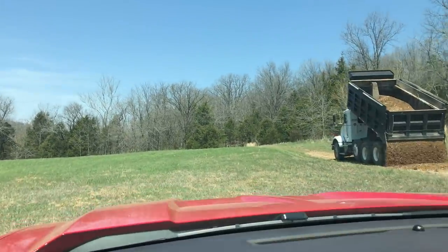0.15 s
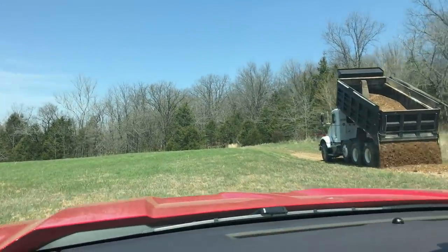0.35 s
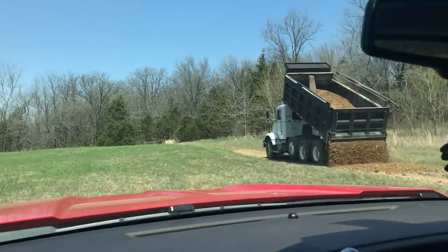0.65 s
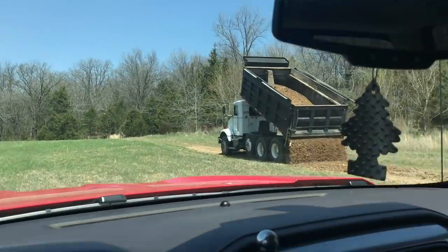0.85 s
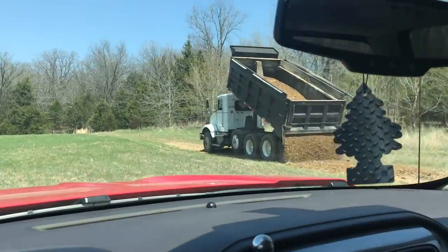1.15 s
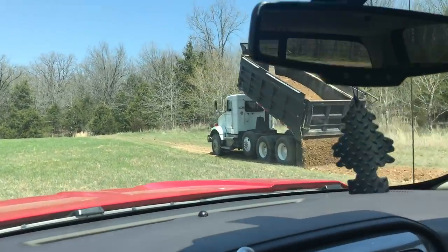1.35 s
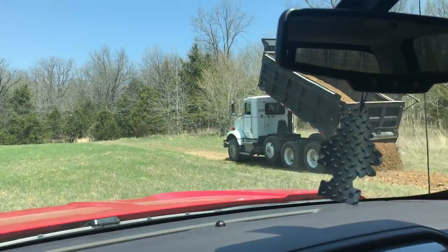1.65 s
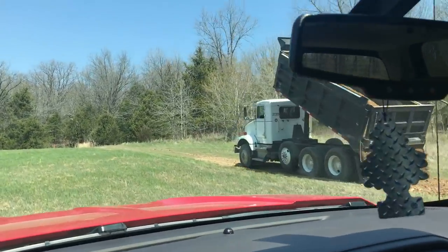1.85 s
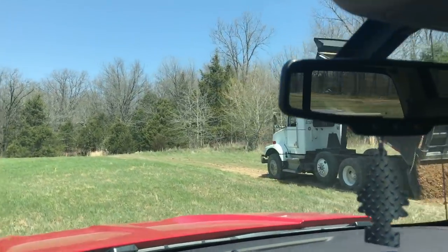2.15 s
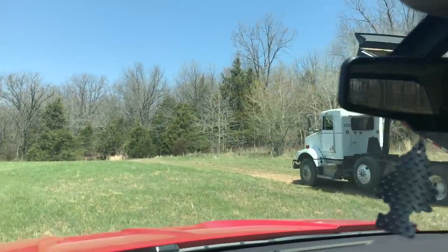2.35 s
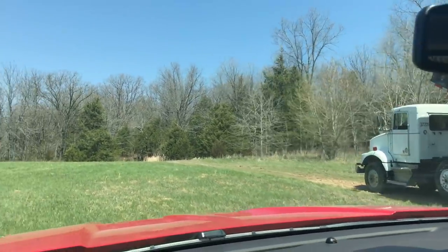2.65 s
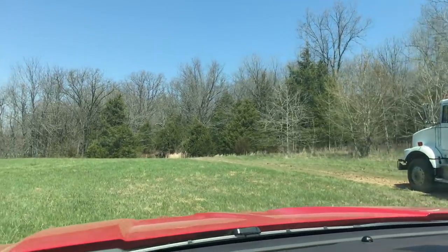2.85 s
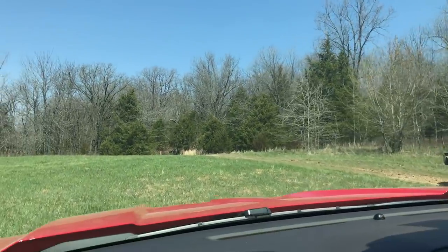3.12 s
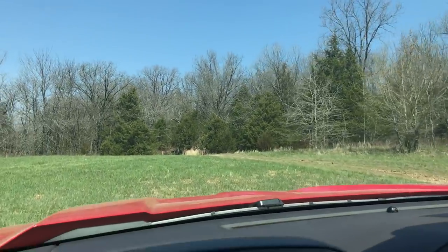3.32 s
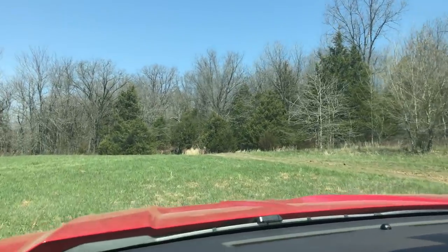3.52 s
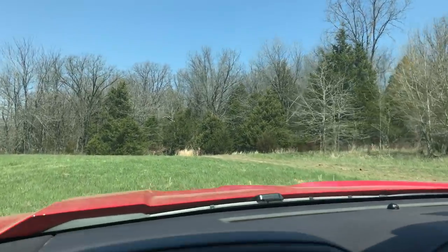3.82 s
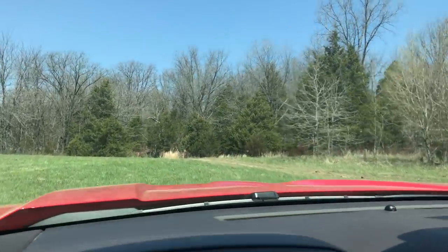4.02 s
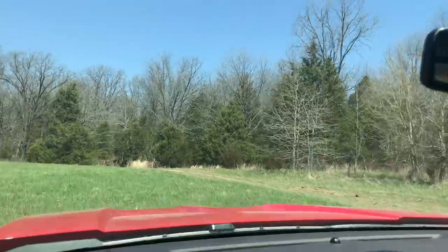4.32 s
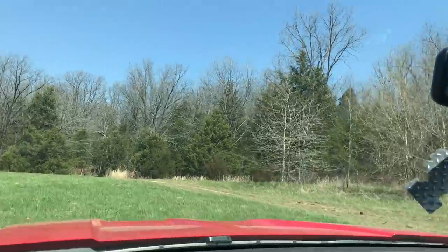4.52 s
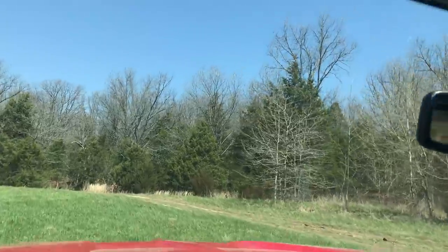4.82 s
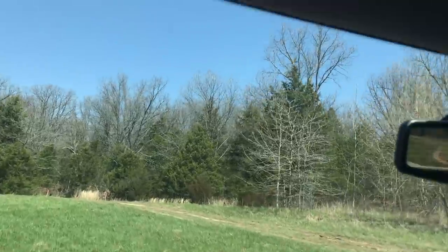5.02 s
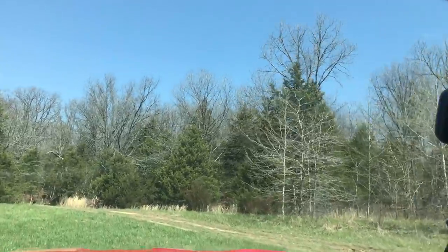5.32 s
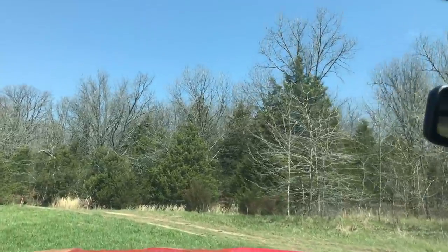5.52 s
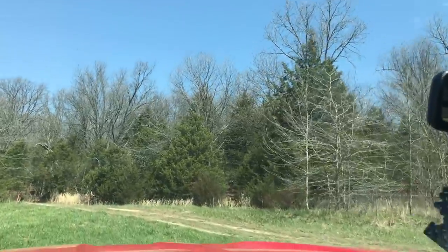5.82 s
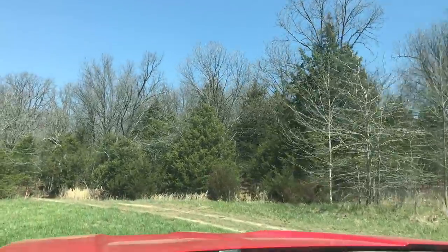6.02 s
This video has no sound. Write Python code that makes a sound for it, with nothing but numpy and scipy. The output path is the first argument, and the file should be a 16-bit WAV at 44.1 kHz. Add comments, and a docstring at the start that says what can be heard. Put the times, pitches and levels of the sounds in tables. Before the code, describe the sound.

Inside a slowly moving truck, a low boom and tyre rumble carry on under soft bumps, a steady vent fan and occasional small clacks.

```python
"""A deep boom and rumble fill the closed cab of a pickup rolling slowly over a rough track.
Ruts rock the body, the tyres shake the floor and panels, the engine hums, the drivetrain whines
faintly and the vent fan blows steadily. Grit ticks under the tyres and the suspension bumps.
Now and then something rustles softly, small metal clinks and loose plastic clacks at the jolts."""
import sys
import numpy as np
from scipy import signal
from scipy.fft import rfft, irfft, next_fast_len
from scipy.io import wavfile
from scipy.ndimage import uniform_filter1d

SR = 44100
rng = np.random.default_rng(int(sys.argv[2]) if len(sys.argv) > 2 else 0)


def to_wav(s):
    """Save 16-bit WAV."""
    ch = np.atleast_2d(s).T  # columns
    pcm = np.round(np.clip(ch, -1, 1) * 32767)  # PCM
    wavfile.write(sys.argv[1], SR, pcm.astype(np.int16))


N = 271897
TIME = np.arange(N) / SR


def from_db(db):
    return 10 ** (np.asarray(db) / 20)


def unit_level(x):
    """Scales a signal to an average (rms) level of 1."""
    return x / np.sqrt(np.mean(x ** 2) + 1e-20)


def curves(rows):
    """Joins rows that start with a time by straight lines: one curve for each other column."""
    times, *columns = np.transpose(rows)
    return [np.interp(TIME, times, column) for column in columns]


def noise(spectrum, resonances=(), tilt_db=0, size=N):
    """Noise of level 1, shaped by a spectrum, its resonances and a tilt in dB per octave."""
    padded = next_fast_len(size)
    hz = np.maximum(np.fft.rfftfreq(padded, 1 / SR), 1)
    points_hz, points_db = np.transpose(spectrum)
    db = np.interp(np.log(hz), np.log(points_hz), points_db) + tilt_db * np.log2(hz / points_hz[0])
    octaves_outside = np.abs(np.log2(hz / np.clip(hz, points_hz[0], points_hz[-1])))
    db -= 24 * octaves_outside
    for centre_hz, width_hz, lift_db in resonances:
        db += lift_db / (1 + (2 * (hz - centre_hz) / width_hz) ** 2)
    white = rfft(rng.standard_normal(padded))
    return unit_level(irfft(white * from_db(db), padded)[:size])


def drift(per_s):
    """A smooth random wander of about 1 either way, changing about per_s times a second."""
    hz = np.fft.rfftfreq(8192, 1 / 1000)   # 1000 points a second
    slow = irfft(rfft(rng.standard_normal(8192)) / (1 + (hz / per_s) ** 2))
    return unit_level(np.interp(TIME, np.arange(len(slow)) / 1000, slow))


def evened(x, span_s):
    """Levels out any swells slower than span_s."""
    power = uniform_filter1d(np.abs(signal.hilbert(x)) ** 2, max(int(span_s * SR), 1))
    return unit_level(x / np.sqrt(power + 1e-9))


def swell(peak_s, length_s):
    """A smooth rise to 1 and fall again."""
    return np.exp(-(2 * (TIME - peak_s) / length_s) ** 2)


def decay(t, fade_s):
    """Falls by 60 dB in fade_s seconds."""
    return np.exp(-np.log(1000) * t / fade_s)


def add(out, start_s, sound):
    """Mixes a sound into out from start_s on."""
    start = max(int(start_s * SR), 0)
    out[start:start + len(sound)] += sound[:N - start]


def pings(blows, fade_s, rise_s):
    """Each blow rings one fading tone, rising in rise_s."""
    out, t = np.zeros(N), TIME[:SR // 4]
    for start_s, hz, db in blows:
        tone = from_db(db) * np.sin(2 * np.pi * hz * t)
        add(out, start_s, tone * decay(t, fade_s) * (1 - np.exp(-t / rise_s)))
    return out


# how hard the track shakes the truck: (time [s], level [dB])
TRACK_SHAKE = [(0.0, -25), (0.06, -32.5), (0.24, -34), (0.48, -28.5), (0.7, -30), (0.82, -33), (1.6, -37.5),
               (2.21, -37), (2.7, -37), (2.97, -39.5), (3.55, -35), (3.78, -34), (3.96, -36), (4.25, -35.5),
               (4.65, -37.5), (5.25, -35), (5.5, -36), (5.7, -35.5), (6.04, -32.5), (6.17, -36.5)]


def roughness_db(usual_db=-36):
    """How much rougher than usual the ground is at each moment."""
    return curves(TRACK_SHAKE)[0] - usual_db


# the deep sound of the rocking body: (frequency [Hz], relative level [dB])
BOOM_SPECTRUM = [(6, -11), (13, -5.5), (22, 3), (30, 0), (38, -8), (52, -21), (90, -77)]
# ruts that heave the body: (time of the peak [s], level [dB])
RUT_HEAVES = [(.38, -13.5), (0.491, -13.5), (.64, -15.5), (.94, -19), (1.33, -18), (1.56, -18), (1.91, -16),
              (2.11, -18.5), (2.48, -22), (3.57, -23.5), (3.8, -23.5), (4.29, -20.5), (4.48, -16.5),
              (4.93, -19.5), (5.17, -20.5), (6.01, -22)]


def body_boom(level_db=-25, throb_db=1.0):
    """Rough ground and ruts rock the body, which booms at its own low pitch."""
    rocking = from_db(level_db + roughness_db() + throb_db * drift(8.5))
    heaves = sum(from_db(db) * swell(peak_s, length_s=0.089) for peak_s, db in RUT_HEAVES)
    return np.hypot(rocking, heaves) * evened(noise(BOOM_SPECTRUM), span_s=0.11)


# the tyres heard through the floor: (frequency [Hz], relative level [dB])
TYRE_SPECTRUM = [(25, -25.5), (45, 1), (62, 0), (85, -6), (105, -12.5), (128, -9.5), (160, -14.5),
                 (200, -29.5), (320, -26.5)]


def tyre_rumble(level_db=-36.5, throb_db=1.3):
    """The tread shakes the floor, harder on rougher ground."""
    loudness = from_db(level_db + roughness_db() + throb_db * drift(4.6))
    return loudness * evened(noise(TYRE_SPECTRUM), span_s=0.11)


# engine speed and its two main tones, at 3 and 4 vibrations per turn:
# (time [s], speed [turns per s], third tone level [dB], fourth tone level [dB])
ENGINE_RUN = [(0, 26.9, -40.5, -52.5), (1.3, 23.8, -47, -50), (1.9, 26, -46, -45.5),
              (2.45, 28.2, -41.5, -51), (3.1, 28.5, -42.5, -48), (3.6, 31.6, -45.5, -48),
              (4.1, 28, -34.5, -51), (4.5, 34.2, -47.5, -48.5), (4.8, 30.6, -46, -52),
              (5.2, 31.6, -49, -41), (5.5, 28, -38.5, -55), (6.17, 29.7, -37, -39)]
# weaker engine tones: (vibrations per turn [count], level [dB])
FAINT_TONES = [(2, -57), (6, -53)]


def engine_hum(wobble=0.00592, waver_db=3.0, shudder_db=2.0):
    """The engine shudders on its mounts; its hum shifts between two main tones with the load."""
    turns_per_s, third_db, fourth_db = curves(ENGINE_RUN)
    angle = 2 * np.pi * np.cumsum(turns_per_s * (1 + wobble * drift(5.7))) / SR
    hum = np.zeros(N)
    for per_turn, db in [(3, third_db), (4, fourth_db), *FAINT_TONES]:
        loudness = from_db(db + waver_db * drift(4.3))
        hum += loudness * np.sin(per_turn * angle + rng.uniform(0, 2 * np.pi))
    return hum * from_db(shudder_db * drift(27))


# the drone of the cab's panels: (frequency [Hz], relative level [dB])
PANEL_SPECTRUM = [(110, -8.5), (170, -4), (208, 2), (250, -3), (325, -1.5), (400, -8), (470, -15),
                  (700, -19.5)]


def panel_drone(level_db=-47, ground_share=0.31, usual_turns_per_s=29):
    """The tread shakes the panels; they grow louder on rough ground and as the engine speeds up."""
    speed_db = 0.4 * (curves(ENGINE_RUN)[0] - usual_turns_per_s)
    loudness = from_db(level_db + ground_share * roughness_db() + speed_db)
    return loudness * evened(noise(PANEL_SPECTRUM), span_s=0.32)


# the whine of the parts that drive the wheels: (time [s], pitch [Hz], level [dB])
WHINE_PATH = [(0, 335, -61), (.6, 328.2, -54), (1.05, 322.7, -61), (1.27, 315, -49.5), (1.45, 312.7, -61),
              (3.85, 315.4, -54.5), (4.12, 316.5, -42.5), (4.4, 324.7, -57), (5.15, 327.8, -49),
              (5.45, 324.4, -59), (6.17, 325.3, -64)]


def drivetrain_whine(wobble=0.007, waver_db=4.5):
    """The drivetrain sings one faint, wavering tone that swells with the load."""
    hz, level_db = curves(WHINE_PATH)
    angle = 2 * np.pi * np.cumsum(hz * (1 + wobble * drift(10.2))) / SR
    return from_db(level_db + waver_db * drift(12)) * np.sin(angle)


# the rush of fan air: (frequency [Hz], relative level [dB])
AIR_SPECTRUM = [(300, -5.5), (480, -2), (640, 3), (780, -1.5), (1000, -7.5), (1600, -14), (2400, -16),
                (3400, -18.5), (4700, -22.5), (6500, -32), (8500, -36), (11000, -40), (17000, -42)]
# pitches at which the air ducts and the cab ring: (pitch [Hz], width [Hz], boost [dB])
DUCT_RESONANCES = [(556.3, 56, 11), (709, 16, 2.5), (820, 29, 6), (1404, 90, 4.5), (1591, 65, 8),
                   (1780, 42, 2.5), (2147, 76, 6.5), (3110, 210, 2), (3545, 110, 3.5)]


def vent_fan(level_db=-48, flutter_db=0.5):
    """Fan air rushes steadily through the ducts, which boost their own pitches."""
    return from_db(level_db + flutter_db * drift(26)) * noise(AIR_SPECTRUM, DUCT_RESONANCES)


# a hard click, for the grit and also the loose plastic: (frequency [Hz], relative level [dB])
CLICK_SPECTRUM = [(1200, -2.5), (2300, -6.5), (3100, 7), (3800, -5.5), (4900, 1), (6400, -8), (8000, -9.5),
                  (9500, -18.5), (13000, -23), (17000, -11)]


def grit(per_s=30, spread_db=4.0, level_db=-68, decay_s=0.0054):
    """Small stones tick under the tyres at random, barely heard through the floor."""
    sizes = from_db(spread_db * np.minimum(rng.exponential(1, N), 3))
    ticks = sizes * (rng.random(N) < per_s / SR)
    fading_ticks = signal.lfilter([1], [1, -np.exp(-1 / (decay_s * SR))], ticks + 1e-18)
    return from_db(level_db) * fading_ticks * noise(CLICK_SPECTRUM, tilt_db=-2.0)


# blows to the suspension: (time [s], pitch [Hz], level [dB])
SUSPENSION_BLOWS = [(.02, 223, -37), (.265, 392, -37.5), (.365, 207, -26.5), (.39, 144, -24),
                    (.45, 90, -21), (.54, 76, -17), (.63, 68.5, -23), (.84, 288, -29), (1.03, 260, -32),
                    (2.945, 280, -35.5), (3.165, 125, -23.5), (3.27, 202, -31.5), (3.89, 71, -25),
                    (4.47, 213.3, -29.5)]


def suspension_bumps():
    """The suspension takes soft blows, each a short, dull tone."""
    return pings(SUSPENSION_BLOWS, fade_s=0.11, rise_s=0.0055)


# moments of rustling: (time of the peak [s], length [s], level [dB])
RUSTLE_SWELLS = [(0.044, 0.15, -63.5), (0.16, 0.055, -67), (0.248, .025, -66), (0.438, 0.55, -66.5),
                 (.41, 0.075, -70), (2.557, 0.28, -74), (2.95, 0.19, -69.5), (3.29, 0.13, -68),
                 (3.764, 0.11, -67), (3.892, 0.028, -63), (3.962, 0.096, -61.5), (4.035, 0.09, -64),
                 (6.0, 0.068, -68)]
# the hiss of a rustle: (frequency [Hz], relative level [dB])
RUSTLE_SPECTRUM = [(1200, 5), (4000, 8.5), (7500, -1), (10000, -4.5), (14000, -8), (17000, -6)]


def rustles(grain_db=2.0):
    """Soft, grainy brushing swells and fades."""
    loudness = sum(from_db(db) * swell(peak_s, length_s) for peak_s, length_s, db in RUSTLE_SWELLS)
    return loudness * from_db(grain_db * drift(120)) * noise(RUSTLE_SPECTRUM)


# small metal pieces touching: (time [s], pitch [Hz], level [dB])
METAL_TOUCHES = [(0.116, 5380, -47), (.126, 9000, -63.5), (.13, 7200, -62), (.249, 14050, -47),
                 (.333, 10400, -69), (.447, 15000, -63), (2.699, 16850, -53), (3.162, 16750, -57),
                 (4.332, 16750, -62), (5.212, 9550, -61)]
# the dry tick of each touch: (frequency [Hz], relative level [dB])
TICK_SPECTRUM = [(5000, 6), (16000, -2)]


def metal_clinks(tick_db=-12.0, tick_fade_s=0.033):
    """Small metal pieces touch: a dry tick starts a thin ring."""
    ticks = np.zeros(N)
    for start_s, _, db in METAL_TOUCHES:
        ticks += from_db(db + tick_db) * (TIME > start_s) * decay(np.abs(TIME - start_s), tick_fade_s)
    return pings(METAL_TOUCHES, fade_s=0.042, rise_s=0.0006) + ticks * noise(TICK_SPECTRUM)


# the hollow thud of plastic: (frequency [Hz], relative level [dB])
THUD_SPECTRUM = [(300, -2), (500, 9), (800, 4.5), (1150, -5.5), (1500, -2.5), (2000, -5.5), (2600, -25)]
# pitches that the plastic boosts or dampens: (pitch [Hz], width [Hz], boost [dB])
PLASTIC_RESONANCES = [(747, 75, 14.5), (1020, 56, 8.5), (1391, 125, 14), (1624, 140, 3), (1913, 58, 13.5),
                      (3180, 300, 0.5), (4220, 58, 5.5), (4370, 70, 1), (4650, 82, 3), (5040, 51, -3),
                      (5270, 41, -7), (5750, 160, -5), (7500, 55, 11), (8400, 160, 4.5), (10380, 330, 8)]


def plastic_clack(ring_hz, ring_width_hz, ring_db, ring_fade_s, tilt_db, top_hz, thud_db):
    """One hit on plastic: a bright crack, one leading ring and a hollow thud; the cab adds a tail."""
    t = TIME[:SR // 5]
    crack = noise(CLICK_SPECTRUM, PLASTIC_RESONANCES, tilt_db=tilt_db, size=len(t))
    crack = signal.sosfilt(signal.butter(2, top_hz, fs=SR, output="sos"), crack)
    thud = noise(THUD_SPECTRUM, PLASTIC_RESONANCES, size=len(t))
    ring_filter = signal.iirpeak(ring_hz, ring_hz / ring_width_hz, fs=SR)
    ring = rng.standard_normal(2 * len(t))
    for _ in range(2):
        ring = signal.lfilter(*ring_filter, ring)
    ring = unit_level(ring[len(t):])   # keep the half where the ring has settled
    rise = 1 - np.exp(-t / 0.00051)
    snap = from_db(-4.5) * np.exp(-(t / 0.0013) ** 2)   # extra punch at the very start
    tail = from_db(-23) * decay(t, fade_s=0.36)
    bright = evened(crack, span_s=0.0068) * (snap + decay(t, fade_s=0.041) + tail)
    leading = from_db(ring_db) * evened(ring, span_s=0.00092) * (decay(t, ring_fade_s) + tail)
    hollow = from_db(thud_db) * evened(thud, span_s=0.011) * (snap + decay(t, fade_s=0.051) + tail)
    return (bright + leading + hollow) * rise


# hits and bounces of loose plastic; ring and thud levels are relative to the crack:
# (time [s], relative level [dB], ring pitch [Hz], ring width [Hz], ring level [dB], ring fade [s],
#  brightness [dB per octave], treble limit [Hz], thud level [dB])
PLASTIC_HITS = [(0.2481, -25.5, 1514, 350, 5, .018, 3, 16200, -3),
                (0.2523, -38, 875, 200, 10, .03, 1, 12000, -6),
                (.265, -32, 4930, 400, -4, .04, 1, 13000, 1),
                (.2684, -30.5, 5000, 500, -2, 0.027, 0.5, 14000, 3),
                (.2705, -42, 630, 200, 12, .025, 2.5, 9000, -2),
                (0.287, -35.5, 1520, 300, 7.5, .035, 7, 7500, -1),
                (0.8228, -35.5, 1550, 300, 0.5, 0.037, 2.5, 8000, 1),
                (0.8388, -46, 5100, 300, -7, .05, 1, 9000, 6),
                (1.3738, -50, 3570, 500, -7, .05, 5, 14000, -9),
                (2.6986, -25.5, 1450, 350, 2.5, .018, 4, 14030, -7),
                (2.7025, -36, 800, 150, 11.5, 0.025, -5, 14000, -3),
                (2.7148, -31.5, 1480, 400, 1, 0.032, 4, 12000, -8),
                (2.7195, -36.5, 850, 250, 5, 0.044, 2, 11000, 7),
                (2.7332, -42, 5500, 900, -6, .03, 3, 9000, 7),
                (2.944, -53, 5300, 400, 0, .05, 3, 11930, -9),
                (3.156, -32.5, 7430, 300, -13, .04, -1, 8500, 5.5),
                (3.173, -38, 4430, 350, 2, .045, 4, 8000, 6),
                (3.177, -34, 4500, 280, 0, .05, 2.5, 8500, -3),
                (3.187, -41, 4450, 350, -3, .045, 3, 7000, 5),
                (3.195, -37, 4450, 350, -2, .045, 1.5, 7000, 3),
                (3.2085, -40, 4480, 350, -1, .04, 0, 6500, 7.5),
                (3.217, -45, 4480, 350, -2, .03, 1, 7000, 9),
                (3.907, -41.5, 4030, 700, -1, .02, 4, 9000, -11),
                (4.3318, -34.5, 3700, 700, 4.5, .05, 2.5, 13000, 3),
                (4.3338, -45, 3020, 250, 12.5, 0.04, 3, 10000, 9),
                (4.3457, -36, 3260, 400, -2, 0.055, -5, 10000, 1),
                (5.212, -48, 3070, 501, -6, .05, 5, 14000, 0),
                (5.2892, -38, 1430, 300, 0, 0.063, -3.5, 9000, 4.5),
                (5.7324, -40, 2380, 801, 1, .035, 1, 14000, 14),
                (5.754, -45, 4535, 500, -9, 0.049, 2, 12000, 4),
                (5.9966, -45.5, 5300, 700, -1, .05, 6, 15030, 1)]


def plastic_rattles(gain_db=-11.0):
    """Loose plastic strikes at a jolt and bounces unevenly, each hit a clack of its own."""
    out = np.zeros(N)
    for start_s, db, *tone in PLASTIC_HITS:
        add(out, start_s, from_db(db + gain_db) * plastic_clack(*tone))
    return out


# echoes off the windscreen, side windows and roof: (delay [s], relative level [dB])
CAB_ECHOES = [(.0017, -35), (.0031, -27), (.0047, -20), (.0071, -24), (0.0105, -14)]


def with_cab_echoes(sound, lowest_hz=1500):
    """Glass and roof bounce the treble back within milliseconds, which colours the sound."""
    treble = signal.sosfilt(signal.butter(2, lowest_hz, "high", fs=SR, output="sos"), sound)
    out = sound.copy()
    for delay_s, db in CAB_ECHOES:
        add(out, delay_s, from_db(db) * treble)
    return out


def scene():
    """Everything meets at one microphone behind the windscreen."""
    shaking = body_boom() + tyre_rumble() + panel_drone()
    driving = shaking + engine_hum() + drivetrain_whine() + grit() + suspension_bumps()
    loose_things = plastic_rattles() + metal_clinks() + rustles()
    return (driving + with_cab_echoes(vent_fan() + loose_things))[None]


def record(dry, fade_s=0.006, top_hz=17100):
    """Fades both ends quickly and steeply cuts the highest treble."""
    fade = np.clip(np.minimum(TIME, TIME[-1] - TIME) / fade_s, 0, 1)
    return signal.sosfilt(signal.ellip(10, 0.1, 80, top_hz, fs=SR, output="sos"), dry * fade)


dry = scene()
out = record(dry)
to_wav(out)
```